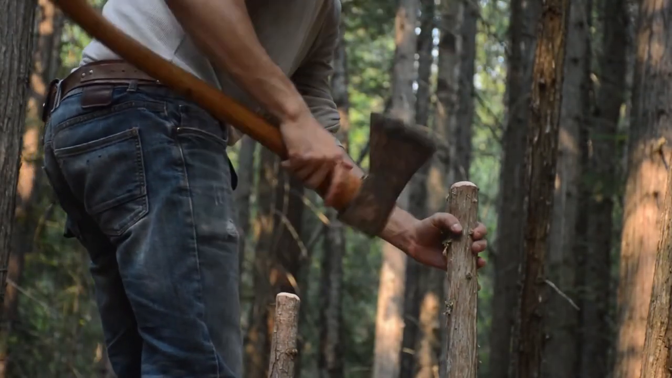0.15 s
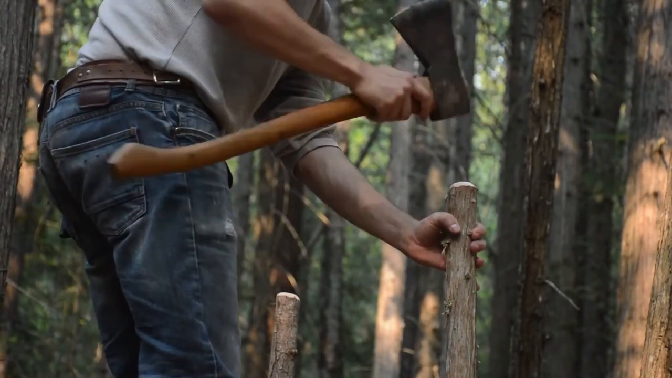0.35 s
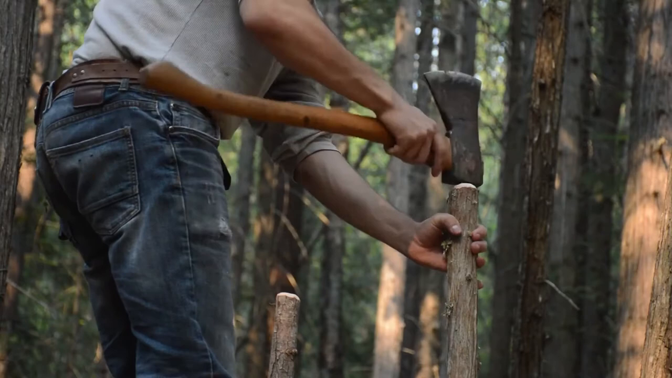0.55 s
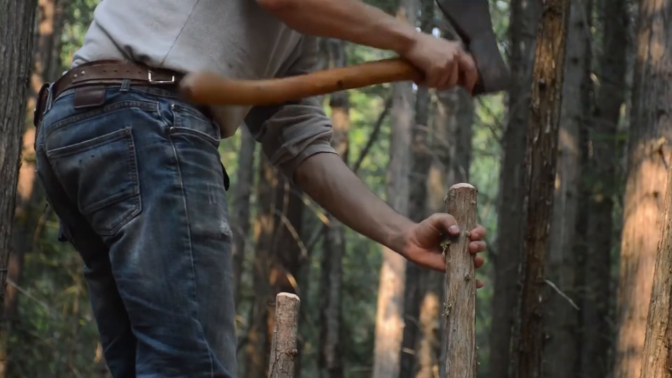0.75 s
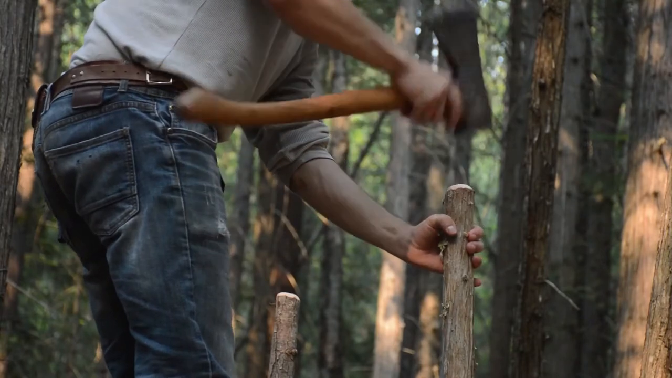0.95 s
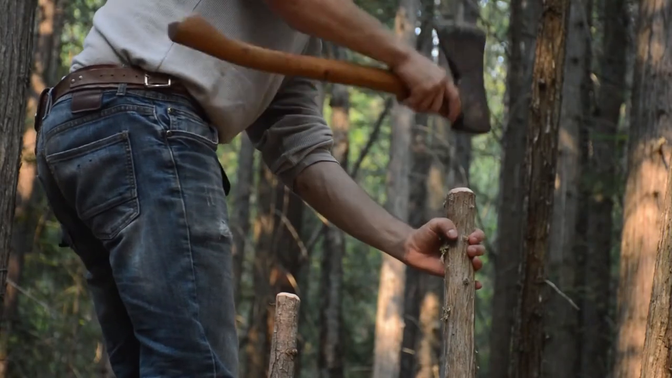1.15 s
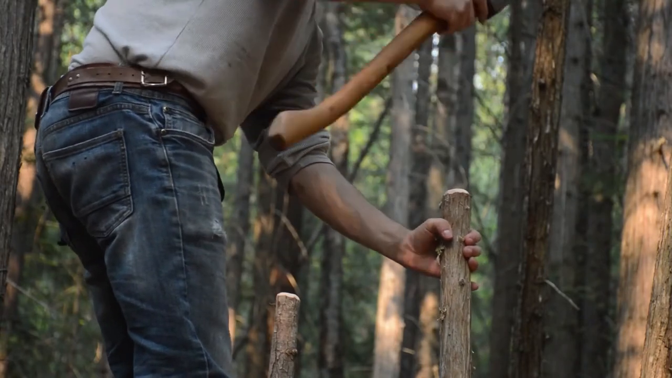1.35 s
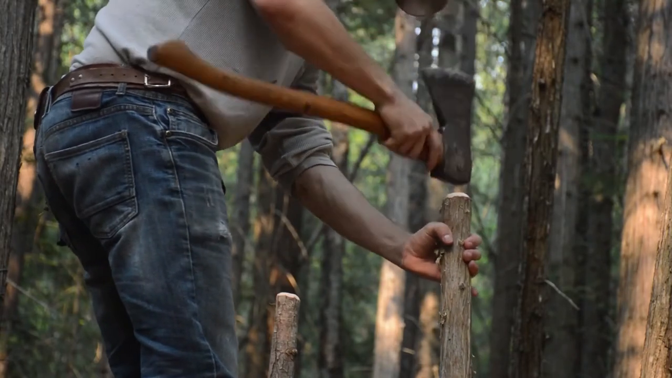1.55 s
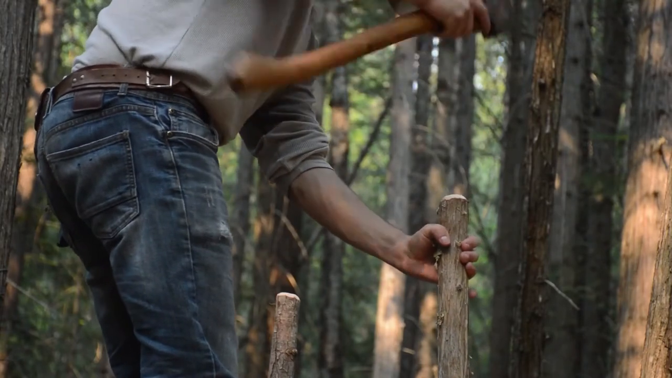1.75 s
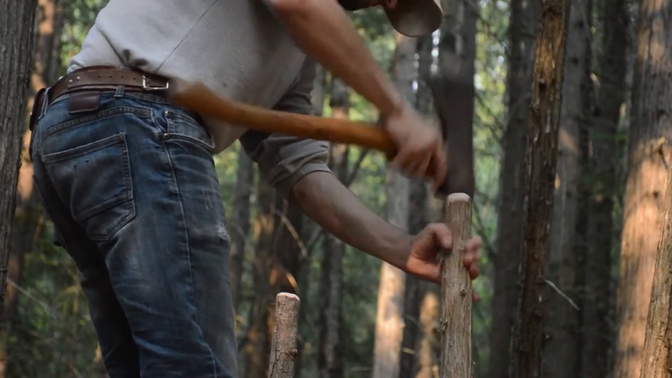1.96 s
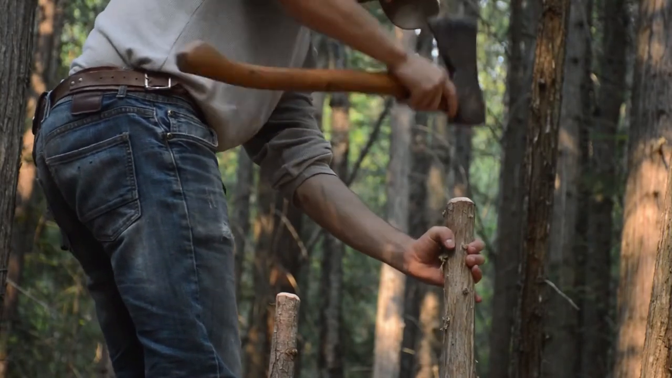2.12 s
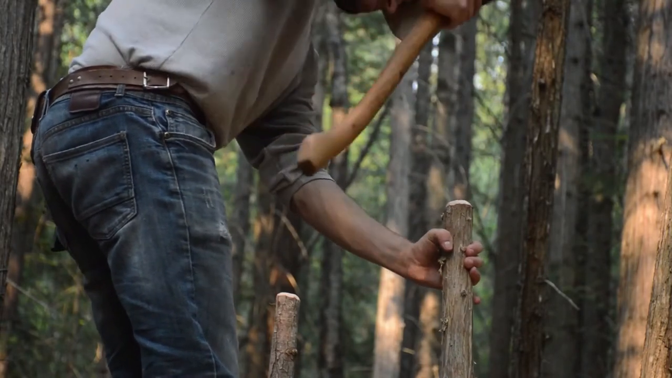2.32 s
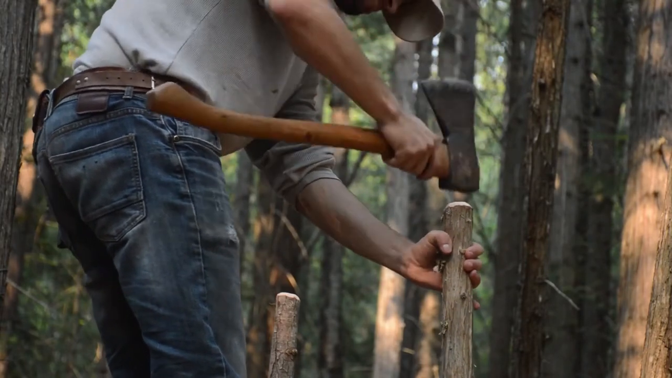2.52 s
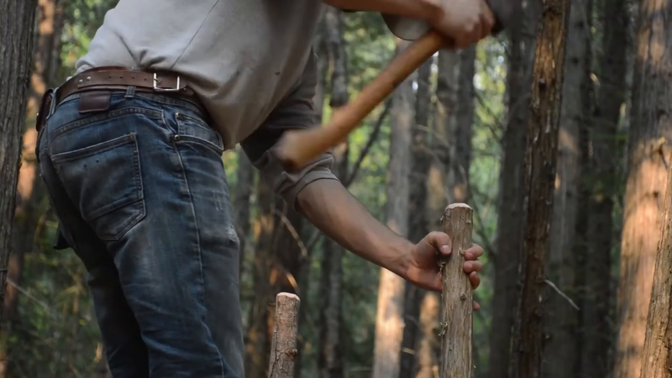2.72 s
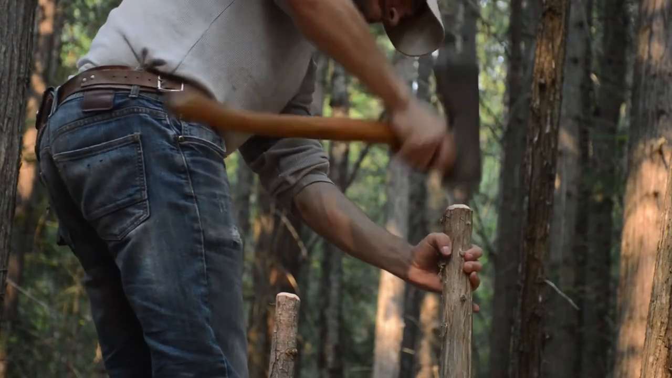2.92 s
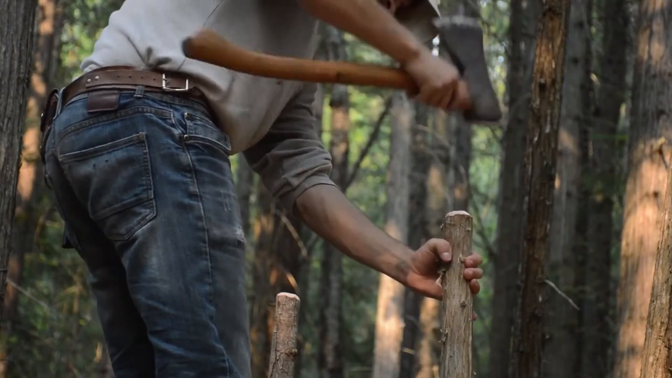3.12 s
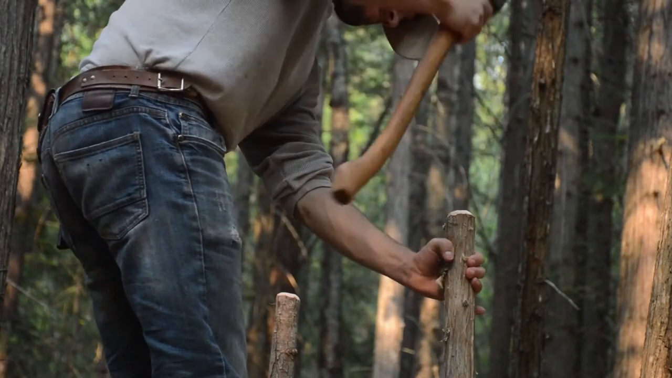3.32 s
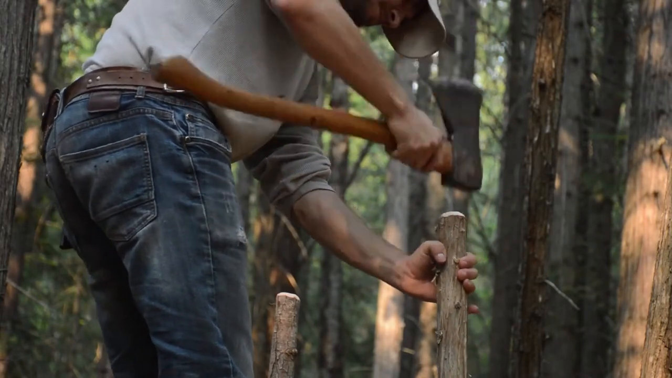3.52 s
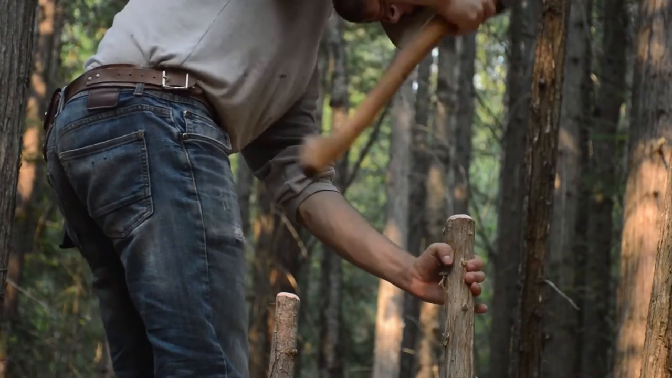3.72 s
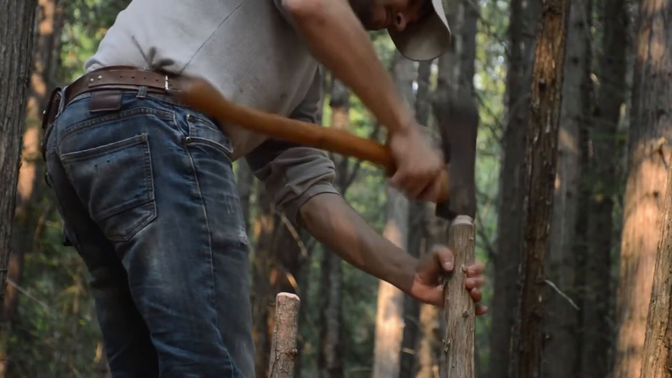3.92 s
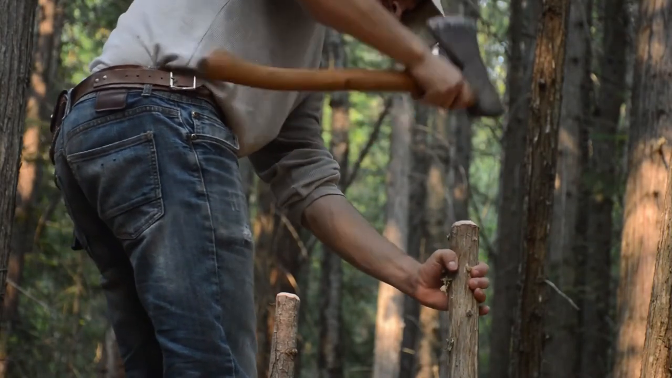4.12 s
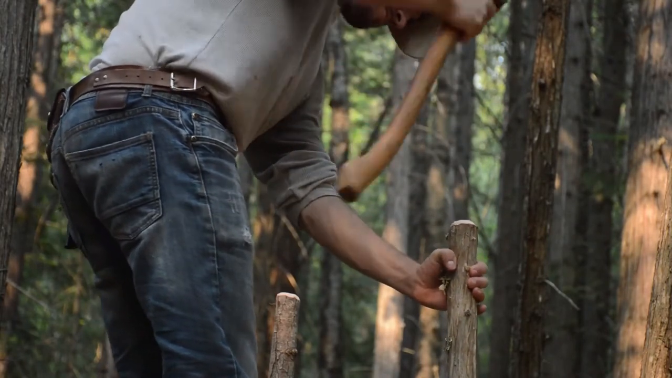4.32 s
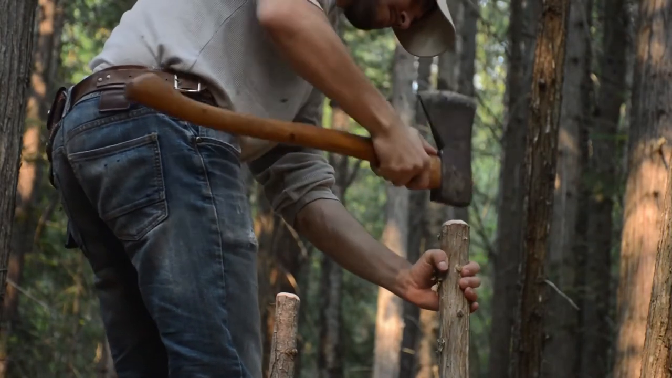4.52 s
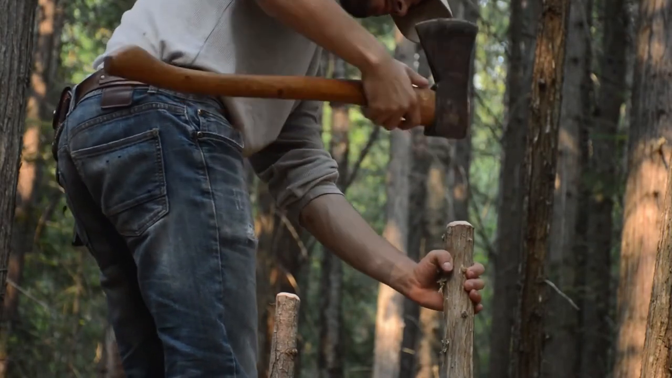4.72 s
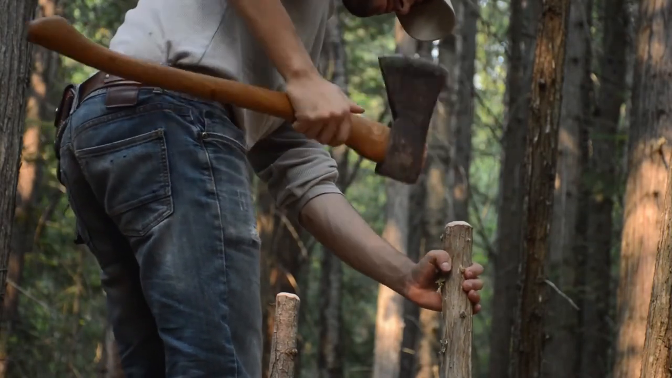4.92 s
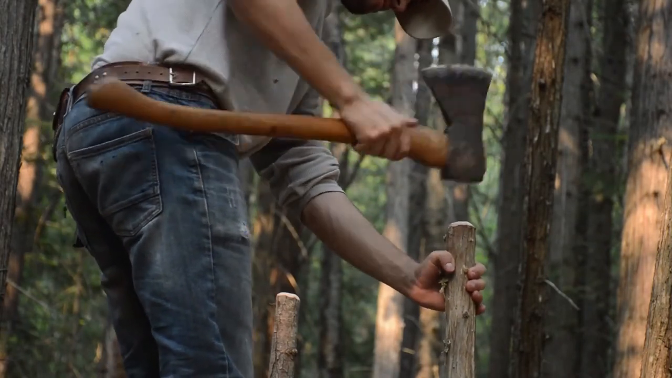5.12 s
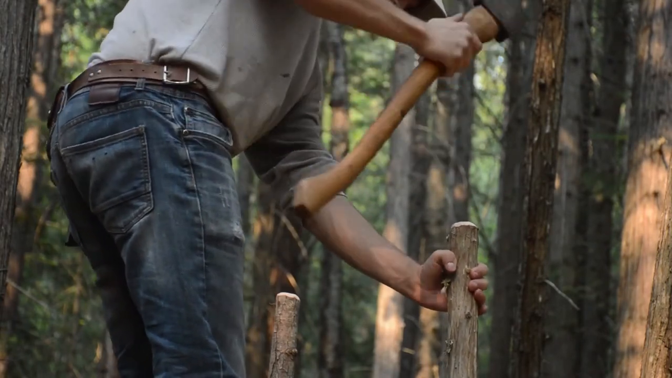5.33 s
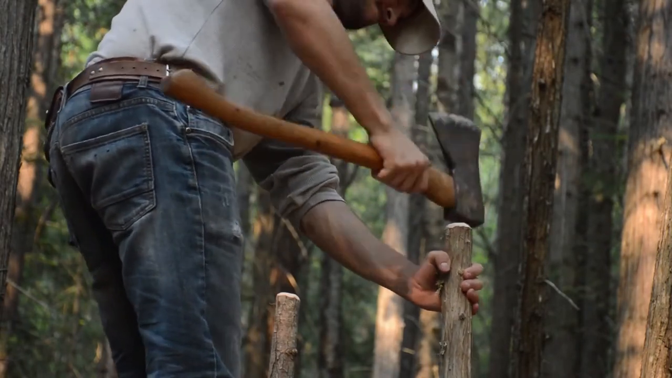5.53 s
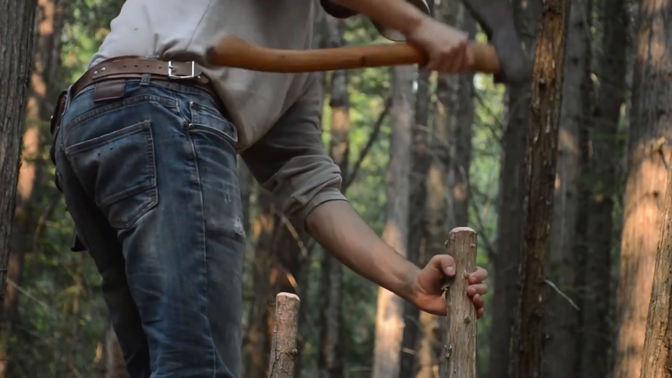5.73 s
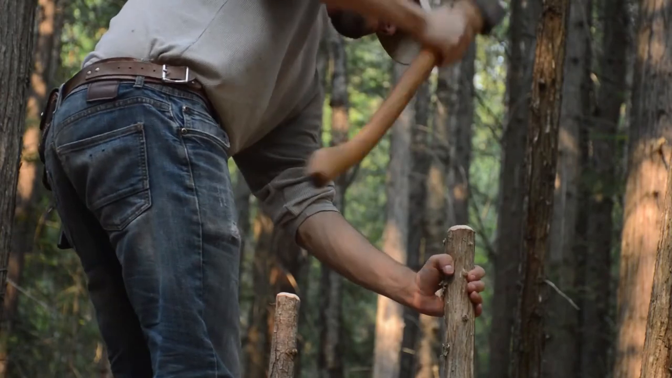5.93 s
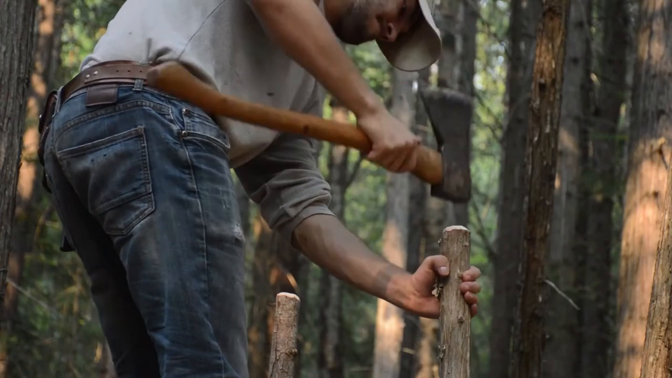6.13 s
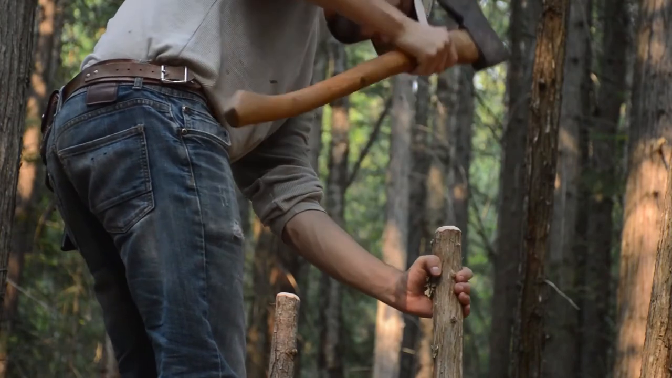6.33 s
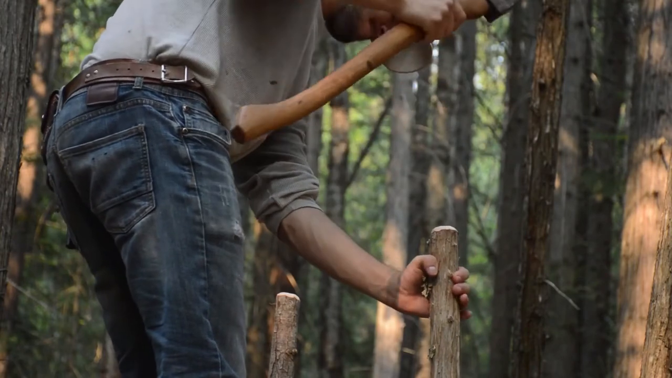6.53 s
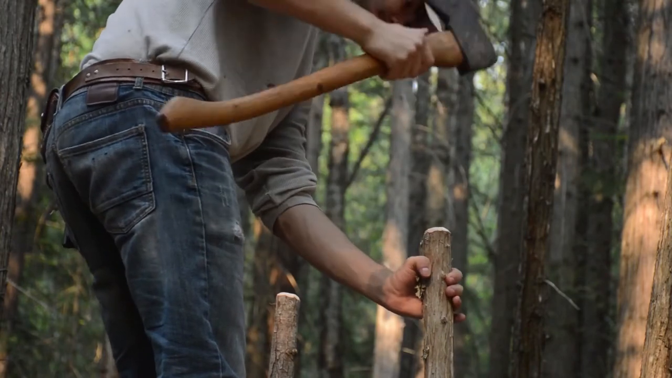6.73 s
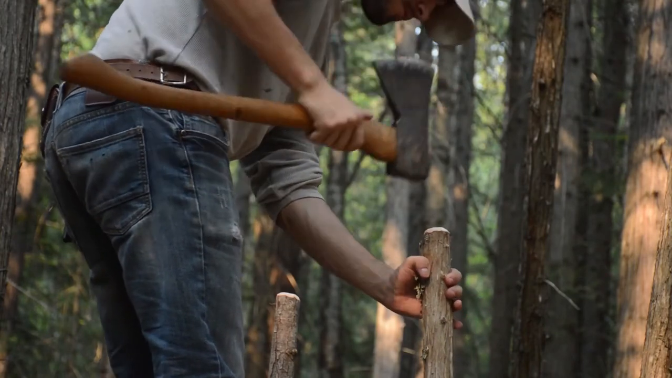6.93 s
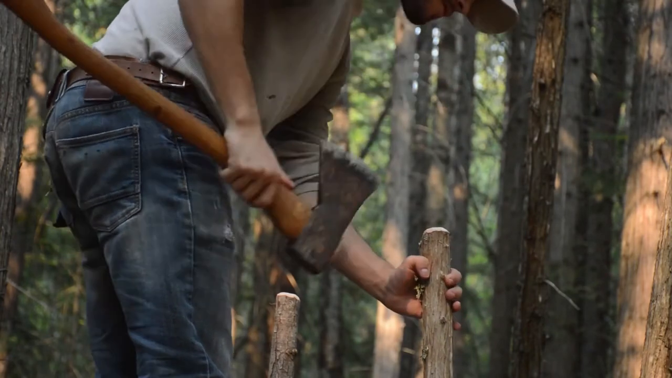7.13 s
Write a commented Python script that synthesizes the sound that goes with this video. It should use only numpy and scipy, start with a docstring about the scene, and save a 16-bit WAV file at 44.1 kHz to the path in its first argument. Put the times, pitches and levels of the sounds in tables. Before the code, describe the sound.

The back of an axe head drives a wooden stake into the forest floor. Nine sharp, woody knocks come about two a second, the first ones lighter, each with a dull ground thud and a thin steel ring. In a short pause the axe shifts in the hand with a small metal tick, then two more hard blows land. The close microphone overloads slightly on the hits, and echoes scatter among the trees over quiet air and a faint low hum.

```python
"""Forest floor: the back of an axe head drives in a wooden stake. Eleven blows, one pause to change grip.
Each blow cracks, rings the stake and the steel, thuds the soil and overloads the close microphone.
The stake springs back for a lighter contact. The ground reflects at once; trunks scatter a long tail.
Quiet forest air and a faint low hum lie beneath."""
import sys
import numpy as np
from scipy import signal
from scipy.fft import rfft, irfft, next_fast_len
from scipy.io import wavfile
from scipy.ndimage import map_coordinates

SR = 44100
rng = np.random.default_rng(int(sys.argv[2]) if len(sys.argv) > 2 else 0)


def file_out(sig):
    """Save sig as 16-bit WAV at sys.argv[1]."""
    # one column per channel
    cols = np.atleast_2d(sig).T
    # limit, then scale
    lim = np.clip(cols, -1, 1)
    pcm = np.round(lim * 32767).astype(np.int16)
    wavfile.write(sys.argv[1], SR, pcm)


N = 315756

# blows; the landing point sets the stake's bend and the steel's modes:
# start_s, effort_db, bend_db, steel_ring_db, low_ping_db, high_ping_db
BLOWS = [ (0.6092, -9, -16.5, -63.5, -45, -38), (1.0829, -5.5, -28, -41, -24.5, -38),
         (1.5716, 1, -33, -35.5, -30, -49), (2.0546, -1, -21, -32, -26, -25.5),
         (2.5302, -1.5, -20.5, -63, -35.5, -35), (3.0307, 2.5, -40, -34.5, -42, -51),
         (3.5270, -.5, -19.5, -34.5, -23, -30.5), (4.0224, .5, -35.5, -65, -41, -46),
         (4.539, -1, -24, -31, -33, -46), (5.5896, 1, -24, -26.5, -46, -35),
         (6.1134, 3.5, -34, -29.5, -37.5, -24.5)]
# gain against swing effort: base_db, db_per_effort_db
BLOW_GAIN = (-3, 0.36)
CRACK_GAIN = (-.3, 0.7)
OVERTONE_GAIN = (1.8, 0.31)
FLANK_GAIN = (-0.89, .6)
THUD_GAIN = (0, 0.55)
REBOUND_GAIN = (-18.5, -0.61)
# contact, crushing end grain, shaken soil: freq_hz, density_db
CRACK_SPECTRUM = [(60, -20), (300, -6), (1000, 1.5), (1800, 1), (2800, 1), (5200, -8), (7700, -9.5),
                  (10500, -12), (13000, -21.5), (16000, -37.5)]
FIBRE_SPECTRUM = [(100, -20.5), (500, -10.5), (1000, 9), (2700, 3), (5200, -12.5), (7700, -9.5),
                  (10500, -19.5), (13000, -25.5), (16000, -41.5)]
SOIL_SPECTRUM = [(20, 0.5), (45, 8.5), (130, -4), (260, -13.5), (600, -30), (2000, -57.5)]
# stake's main knock, overtones, lengthwise modes leaving its flanks: pitch_hz, level_db, t60_s
KNOCK_MODES = [(629, -12.5, 0.022), (780, -10.5, 0.048), (891.4, -9.5, .075), (925.7, 7.5, 0.036)]
OVERTONE_MODES = [(1432, -18.5, 0.093), (1681, -12, 0.099), (1767.7, 2, 0.026), (2046, -19, 0.057),
                  (2207, -22, 0.033), (2708, -10, 0.027), (2905, -17.5, 0.028), (3573, -9, 0.019),
                  (4500, -15, 0.028), (6030, -24.5, 0.015), (7460, -14, .022)]
FLANK_MODES = [(910, -20.5, 0.063), (2740, -19, 0.06)]
# axe head: pitch_hz, t60_s
STEEL_MODES = [(3588, 1.05), (4806, .16), (6348, .22), (9905, .18)]
# grip-change taps: start_s, level_db, centre_hz, width_oct, t60_s
TAPS = [(5.07, -35.5, 1890, 0.4, 0.11), (5.14, -35.5, 860, 0.97, 0.061), (5.1453, -19, 6600, 0.22, 0.0066)]
# metal tick: pitch_hz, level_db, t60_s
TICK_MODES = [(6900, -29, 0.059), (7160, -51, 0.18), (11300, -49, 0.12)]
# hand and sleeve slides: peak_s, level_db, width_s
SLIDES = [(.152, -62, .012), (4.86, -61, 0.033), (5.115, -60, 0.022), (5.362, -62.5, .003)]
# trunk scatter colour: freq_hz, level_db
TRUNK_SPECTRUM = [(80, -9.5), (400, -9), (900, -4.5), (1800, 5.5), (3500, 3), (7000, -0.5), (10000, 7.5),
                  (12500, -8), (15000, -29.5)]
# trunk scatter decay: freq_hz, t60_s
TRUNK_DECAY = [(100, 6.3), (900, 1.39), (1800, 1), (3500, 0.97), (6000, 0.88), (10000, 0.34), (15000, 0.75)]
# forest air: freq_hz, density_db
AIR_SPECTRUM = [(20, -25.5), (40, -9.5), (70, -5), (110, -8.5), (170, -12), (280, -16), (400, -11),
                (800, -12), (1100, -14), (1700, -16), (4000, -23.5), (8000, -29.5), (15500, -32.5)]
# hum partials: pitch_hz, rms_db
HUM_PARTIALS = [(110, -64.5), (172, -68.5), (222, -72.5), (268, -71.5)]


def blow(effort_db, bend_db, shade_db=0, bend_hz=428, bend_t60_s=0.15):
    """Steel on end grain: crack, crushing fibres, stake modes. Harder is brighter."""
    t = np.arange(SR // 5) / SR
    crack_db = effort_level(CRACK_GAIN, effort_db) + shade_db
    tilt_db_per_oct = 0.58 * effort_db
    crack = amp(crack_db + 12) * noise(tilted(CRACK_SPECTRUM, tilt_db_per_oct), len(t)) * fade(t, 0.012)
    fibres = amp(crack_db - 12) * noise(tilted(FIBRE_SPECTRUM, tilt_db_per_oct), len(t)) * fade(t, 0.059)
    knock = ring(KNOCK_MODES, t, spread_db=1.67)
    bend = amp(bend_db) * tone(bend_hz, bend_t60_s, t)
    overtones = amp(effort_level(OVERTONE_GAIN, effort_db)) * ring(OVERTONE_MODES, t, spread_db=3.06)
    attack = 1 - np.exp(-t / 0.0003)
    return attack * (crack + fibres + knock + bend + overtones)


def pounding(trunks_db=-23, shade_db=-5, directions=3):
    """All blows: direct sound, steel, soil, and trunk echoes coloured differently per direction."""
    track, t = np.zeros(N), np.arange(SR // 5) / SR
    for start_s, effort_db, bend_db, *steel_db in BLOWS:
        direct = nearby(blow(effort_db, bend_db))
        # the stake radiates all round; the head shades the crack
        flank_gain = amp(effort_level(FLANK_GAIN, effort_db))
        outward = [blow(effort_db, bend_db, shade_db) + flank_gain * ring(FLANK_MODES, t, spread_db=6.5)
                   for _ in range(directions)]
        echoes = sum(signal.fftconvolve(sound, trunk_response()) for sound in outward)
        echoes *= amp(trunks_db) / np.sqrt(directions)
        thud = amp(effort_level(THUD_GAIN, effort_db)) * soil_thud()
        for part in (direct, steel_ring(start_s, steel_db), thud, echoes):
            add(track, start_s, amp(effort_level(BLOW_GAIN, effort_db)) * part)
    return track


def steel_ring(start_s, levels_db, waver_db=3, waver_hz=9, grip_s=4.79, grip_t60_s=0.53):
    """The head rings, wavering as the axe turns. The hand damps it in the pause."""
    t = np.arange(SR) / SR
    levels_db = [*levels_db, levels_db[-1] - 9]  # top mode follows the high ping
    modes = sum(amp(db) * tone(hz, t60_s, t) for db, (hz, t60_s) in zip(levels_db, STEEL_MODES))
    held_s = np.maximum(start_s + t - grip_s, 0) * (start_s < grip_s)
    waver = amp(waver_db * np.tanh(t / 0.1) * wobble(waver_hz, len(t)))
    return modes * fade(held_s, grip_t60_s) * waver


def soil_thud(push_db=-15, push_s=0.00043, thud_db=-25, shake_db=-40):
    """The stake lurches down and stops; the ground thuds and shakes."""
    t = np.arange(SR // 2) / SR
    push = amp(push_db) * (1 - t / push_s) * np.exp(-t / push_s)
    envelope = amp(thud_db) * fade(t, 0.13) + amp(shake_db) * fade(t, 0.7)
    return push + noise(SOIL_SPECTRUM, len(t)) * envelope


def rebounds(delay_s=0.0113, edge_s=1.0934, edge_db=-5.5):
    """The stake springs back at the head, less when a hard blow sinks it. Once it ticks the edge."""
    track, t = np.zeros(N), np.arange(SR // 10) / SR
    for start_s, effort_db, *_ in BLOWS:
        contact = blow(effort_db=-5.5, bend_db=-30, shade_db=-9)
        add(track, start_s + delay_s, amp(effort_level(REBOUND_GAIN, effort_db)) * contact)
    edge_tick = band(centre_hz=7500, width_oct=0.22, size=len(t)) * fade(t, 0.0061)
    add(track, edge_s, amp(edge_db) * edge_tick)
    return track


def handling(tick_s=5.1455, trunks_db=-22):
    """The axe shifts in the hand: taps, one metal tick, soft slides."""
    track, t, clock_s = np.zeros(N), np.arange(SR // 2) / SR, np.arange(N) / SR
    for start_s, db, centre_hz, width_oct, t60_s in TAPS:
        add(track, start_s, amp(db) * band(centre_hz, width_oct, len(t)) * fade(t, t60_s))
    add(track, tick_s, ring(TICK_MODES, t, spread_db=1.5))
    rub = sum(amp(db) * np.exp(-((clock_s - peak_s) / width_s) ** 2) for peak_s, db, width_s in SLIDES)
    track += rub * band(centre_hz=9000, width_oct=0.39, size=N)
    return nearby(track)[:N] + amp(trunks_db) * signal.fftconvolve(track, trunk_response())[:N]


def nearby(sound, ground_s=0.0116, ground_db=-18, scatter_db=-20, scatter_t60_s=0.12):
    """Direct path, ground bounce and scatter from close objects."""
    t = np.arange(SR // 5) / SR
    scatter = noise([(100, 4.0), (2000, -0.5), (9000, -6), (15000, -14.5)], len(t))
    scatter *= fade(t, scatter_t60_s) * (t > 0.006)
    paths = amp(scatter_db) * scatter / np.linalg.norm(scatter)
    paths[0] += 1
    add(paths, ground_s, amp(ground_db) * np.array([0.2, 0.6, 0.2]))  # leaf litter dulls the bounce
    return signal.fftconvolve(sound, paths)


def trunk_response(build_s=0.0077, grove_s=0.1, grove_width_s=0.016, grove_db=-6, grove_hz=2500):
    """Unit-energy trunk scatter: build-up, dull swell from a farther grove, treble dying first."""
    t = np.arange(SR) / SR
    hz, frame_s, bins = signal.stft(rng.standard_normal(SR), SR, nperseg=256)
    hz = hz[:, None]
    swell = amp(grove_db) * np.exp(-((frame_s - grove_s) / grove_width_s) ** 2)
    swell = swell / (1 + (hz / grove_hz) ** 2)
    bins *= amp(along(TRUNK_SPECTRUM, hz)) * fade(frame_s, along(TRUNK_DECAY, hz)) * (1 + swell)
    tail = signal.istft(bins, SR, nperseg=256)[1][:SR]
    tail *= 1 - np.exp(-(t / build_s) ** 2)
    return tail / np.linalg.norm(tail)


def forest_air(level_db=-52, waver_db=0.26):
    """Near-steady, bass-heavy air noise."""
    return amp(level_db + waver_db * wobble(2.9)) * noise(AIR_SPECTRUM, N)


def low_hum(waver_db=5.0, drift_hz=0.9):
    """Wavering low partials, as of a far engine."""
    track = np.zeros(N)
    for pitch_hz, rms_db in HUM_PARTIALS:
        peak = np.sqrt(2) * amp(rms_db + waver_db * wobble(4.1))
        cycles = np.cumsum(pitch_hz + drift_hz * wobble(2.7)) / SR
        track += peak * np.sin(2 * np.pi * cycles)
    return track


def amp(db):
    """Decibels to gain."""
    return 10 ** (np.asarray(db) / 20)


def effort_level(rule, effort_db):
    """Gain in dB, linear in swing effort."""
    base_db, slope = rule
    return base_db + slope * effort_db


def along(points, hz):
    """Interpolate (freq_hz, value) points on a log axis."""
    freqs_hz, values = np.transpose(points)
    return np.interp(np.log(hz + 1), np.log(freqs_hz + 1), values)


def tilted(spectrum, db_per_oct):
    """Tilt about 2 kHz, shelving below 700 Hz and above 7 kHz."""
    return [(hz, db + db_per_oct * np.log2(np.clip(hz, 700, 7000) / 2000)) for hz, db in spectrum]


def filtered(x, response):
    """Apply the gain curve response(hz)."""
    size = next_fast_len(len(x) + 8192)
    return irfft(rfft(x, size) * response(np.fft.rfftfreq(size, 1 / SR)), size)[:len(x)]


def unit_noise(response, size):
    """Unit-rms noise shaped by response(hz)."""
    x = filtered(rng.standard_normal(size), response)
    return x / np.sqrt(np.mean(x ** 2) + 1e-20)


def noise(spectrum, size):
    """Unit-rms noise from (freq_hz, density_db) points."""
    return unit_noise(lambda hz: amp(along(spectrum, hz)), size)


def band(centre_hz, width_oct, size):
    """Unit-rms noise in one broad resonance."""
    return unit_noise(lambda hz: 1 / (1 + (np.log2((hz + 1) / centre_hz) / width_oct) ** 2), size)


def wobble(rate_hz, size=N):
    """Smooth curve through random knots."""
    knots = rng.standard_normal(int(size * rate_hz / SR) + 4)
    return map_coordinates(knots, [np.arange(size) * rate_hz / SR])


def fade(t, t60_s):
    """Exponential decay, 60 dB in t60_s."""
    return np.exp(-np.log(1000) * t / t60_s)


def tone(hz, t60_s, t):
    """One damped mode."""
    return np.sin(2 * np.pi * hz * t) * fade(t, t60_s)


def ring(modes, t, spread_db):
    """Damped modes, levels randomised per strike."""
    return sum(amp(db + spread_db * rng.standard_normal()) * tone(hz, t60_s, t) for hz, db, t60_s in modes)


def add(track, start_s, sound):
    """Mix sound into track in place."""
    part = track[round(start_s * SR):][:len(sound)]
    part += sound[:len(part)]


def scene():
    """All sources at one microphone."""
    return (pounding() + rebounds() + handling() + forest_air() + low_hum())[None]


def record(dry):
    """Overload clips each blow's onset flat; a steep low-pass follows."""
    cutoff_hz = 15950
    clipped = np.clip(dry[0], -1, 1)
    return filtered(clipped, lambda hz: 1 / np.sqrt(1 + (hz / cutoff_hz) ** 120))[None]


dry = scene()
out = record(dry)
file_out(out)
```